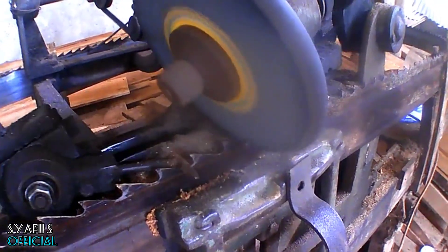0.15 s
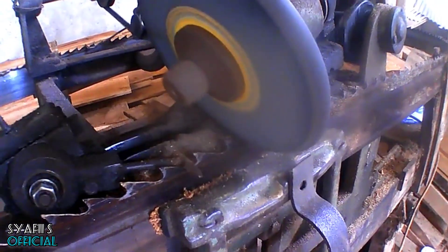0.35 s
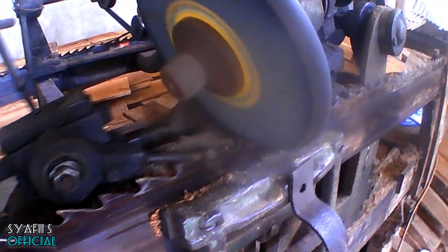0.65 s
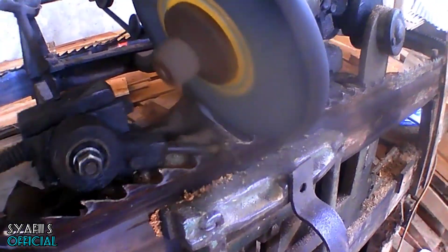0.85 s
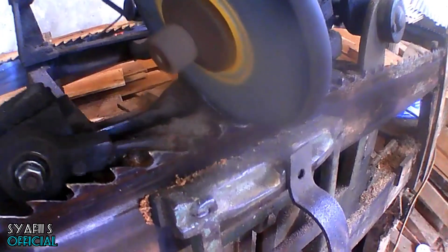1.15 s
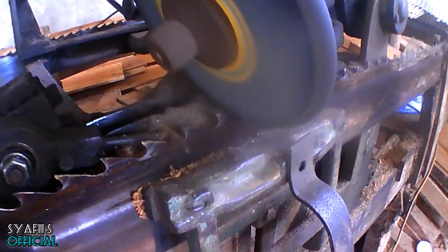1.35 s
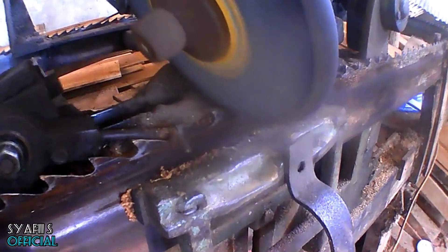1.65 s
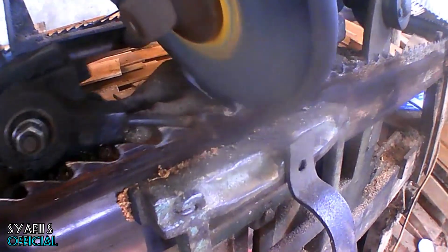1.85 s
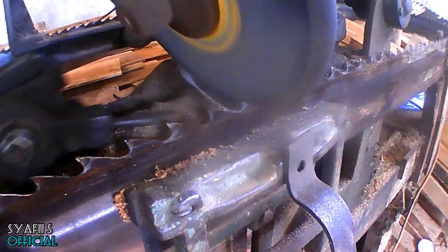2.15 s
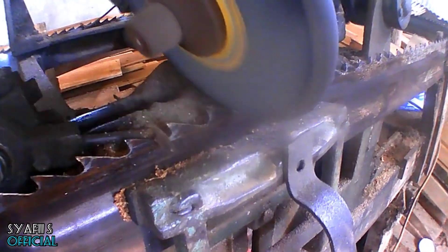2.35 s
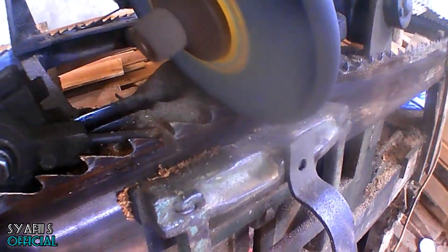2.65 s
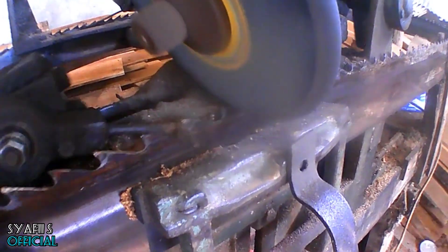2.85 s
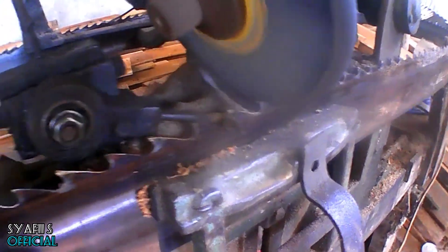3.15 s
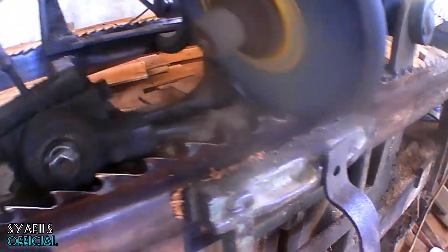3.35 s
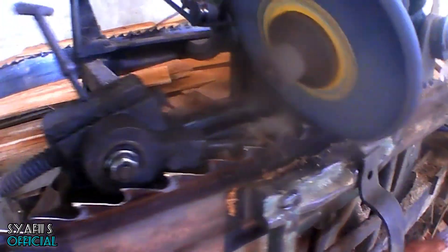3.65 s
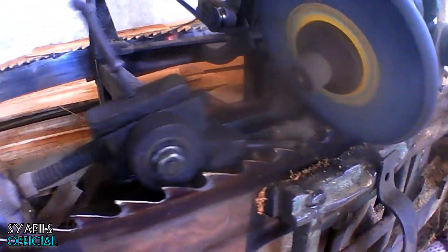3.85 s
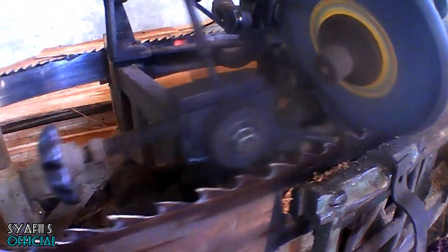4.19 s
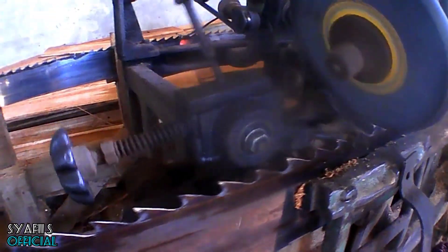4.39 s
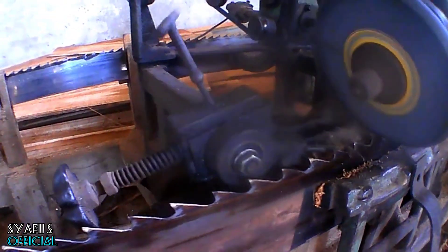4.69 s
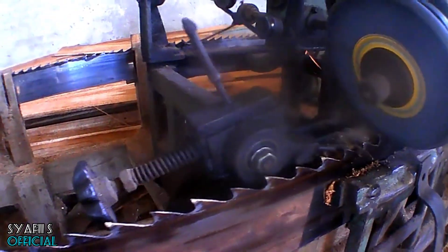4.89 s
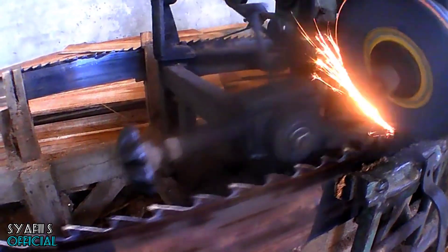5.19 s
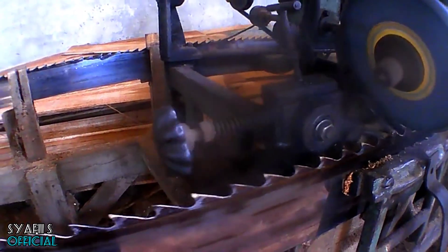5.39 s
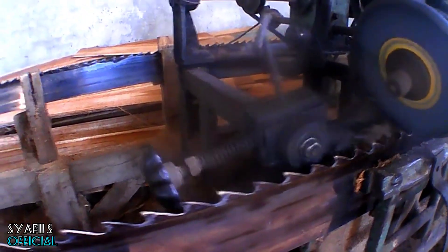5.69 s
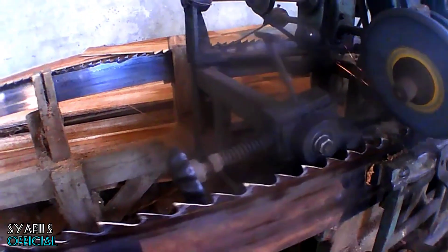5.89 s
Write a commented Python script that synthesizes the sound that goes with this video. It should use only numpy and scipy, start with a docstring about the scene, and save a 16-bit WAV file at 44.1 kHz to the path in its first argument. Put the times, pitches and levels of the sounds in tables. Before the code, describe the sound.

A blade sharpening machine runs throughout, close and somewhat dull, with a steady hiss, a fine rattle and a low hum. Further off a coasting saw whirrs, its pitch sinking slowly. At 0.3 seconds the grinding wheel bites the band saw blade in a short, gritty, rapidly throbbing rasp with a metallic ring. A longer, louder rasp comes from 2.5 to about 2.9 seconds. In between, the blade scuffs softly along its guide and the feed ticks, most clearly around 2 seconds. The distant saw swells into brief whistles from about 3.1 to 3.4 seconds and at 4.5. At 4.8 seconds the wheel grinds more smoothly for about half a second, with a rough high squeal, a few dull ticks and bright spits of sparks. One last short rasp with a sizzle follows at 5.3 seconds. The wooden walls add a short reverb, and the machine runs on.

```python
"""An automatic sharpener works along a band saw blade in a sawmill, heard close and dull. From the start
its drive hisses and hums, and further off a saw whirrs as it coasts. At 0.3 s and 2.5 s the grinding
wheel rasps into the gullets: slightly out of round, it bites once a turn, and its grit rings the blade.
Between the rasps the feed scuffs and ticks. At 4.8 s the wheel squeals over a tooth tip, throwing
sparks, and at 5.3 s it gives one last short rasp."""
import sys
import numpy as np
from scipy import signal
from scipy.fft import rfft, irfft, next_fast_len
from scipy.io import wavfile
from scipy.ndimage import map_coordinates

SR = 44100
rng = np.random.default_rng(int(sys.argv[2]) if len(sys.argv) > 2 else 0)


def generate_wav(signal):
    """Clip the signal to [-1, 1] and save it as 16-bit WAV at the path in sys.argv[1]."""
    frames = np.transpose(np.atleast_2d(signal))
    scaled = np.clip(frames, -1, 1) * 32767
    pcm = np.round(scaled).astype(np.int16)
    wavfile.write(sys.argv[1], SR, pcm)


N = 265923
TIME = np.arange(N) / SR
TOP_HZ = 7300  # the microphone's band limit


def amp(db):
    """Decibels to gain."""
    return 10 ** (np.asarray(db) / 20)


def unit(x):
    """Scale to rms 1."""
    return x / np.sqrt(np.mean(x ** 2) + 1e-20)


def swells(rows):
    """Bell-shaped gains from rows of t/s, half length/s, level/dB."""
    return sum(amp(db) * np.exp(-.5 * ((TIME - s) / half) ** 2) for s, half, db in rows)


def wobble(rate):
    """A smooth random curve, rate knots a second."""
    return map_coordinates(rng.standard_normal(int(N * rate / SR) + 4), [TIME * rate])


def filtered(x, response):
    """x through a complex frequency response."""
    size = next_fast_len(N + SR // 4)
    return irfft(rfft(x, size) * response(np.fft.rfftfreq(size, 1 / SR)), size)[:N]


def coloured(x, points):
    """x through an EQ curve of f/Hz, relative level/dB, scaled to rms 1."""
    f, db = np.transpose(points)
    return unit(filtered(x, lambda hz: amp(np.interp(np.log(hz + 1), np.log(f), db, -120, -120))))


def rung(x, modes, width_hz):
    """x through resonances (f/Hz, relative level/dB) of alternating polarity, scaled to rms 1."""
    def response(f):
        damping = 1j * f * width_hz
        return sum((-1) ** k * amp(db) * damping / (hz * hz - f * f + damping)
                   for k, (hz, db) in enumerate(modes))
    return unit(filtered(x, response))


def grit(clump_db, rate=700):
    """Countless tiny impacts that come in clumps."""
    return unit(rng.standard_normal(N) * amp(clump_db * wobble(rate)))


def grinding():
    """The wheel throbs in the gullets and runs smoother over the tips, squealing on the first."""
    # dips of the wheel: place, landing t/s, level/dB, hold/s, fade/(dB/s), length/s,
    # t/s of one bite, turning f/Hz, dip between bites/dB, tilt/(dB/octave), settling/s
    strokes = [("gullet", .274, -34, .01, 60, .016, 0.37, 32, 14, 2.5, 0.027),
               ("gullet", .309, -25.5, 0.09, 59, .195, .356, 28, 15.6, -1, .04),
               ("gullet", 2.5, -23, .18, 50, 0.406, 2.669, 25.5, 14.2, 1.5, 0.16),
               ("tip", 4.798, -27, 0.12, 26.5, 0.4, 4.925, 28, 3.5, -.5, .05),
               ("tip", 5.343, -29, .05, 100, .125, 3.9, 31, 2.9, 2.2, .05)]
    # the blade rings differently at the two places of contact: f/Hz, relative level/dB
    gullet_modes = [(1674, -42), (1701, -38.5), (1915, -41.5), (2405, -45), (2912, -53), (3036, -53.5),
                    (3494, -50.5), (4043, -45), (4108, -46.5), (4225, -45.5), (4370, -51.5), (4700, -59.5),
                    (5146, -58.5), (5260, -55), (5440, -60)]
    tip_modes = [(1642, -41), (1690, -38), (1857, -40.5), (2412, -39.5), (3095, -48), (3994, -51.5),
                 (4517, -48.5), (5125, -52.5), (5399, -54.5), (5981, -63)]
    # the rush of the grit at those places: f/Hz, relative level/dB
    gullet_rush = [(710, -30), (1200, -15.5), (1420, -14), (1640, 3), (1810, -6.5), (2050, -4.5),
                   (2240, -16.5), (3010, -10), (3290, -19), (4120, -7.5), (4570, -21), (5340, -22.5),
                   (7080, -36), (9200, -67), (15600, -120)]
    tip_rush = [(710, -51.5), (1200, -10), (1430, -17), (1590, 1.5), (1650, 1.5), (2190, -10.5),
                (2380, -19), (2580, -10), (3290, -17.5), (4670, -11.5), (5070, -21.5), (6190, -23.5),
                (7080, -28.5), (9200, -54.5), (15600, -120)]
    in_gullet = [row for row in strokes if row[0] == "gullet"]
    on_tip = [row for row in strokes if row[0] == "tip"]
    gullets = sum(stroke(row, gullet_modes, gullet_rush, rush_db=2, width_hz=31) for row in in_gullet)
    tips = sum(stroke(row, tip_modes, tip_rush, rush_db=1, width_hz=30) for row in on_tip)
    return gullets + tips + squeal(on_tip[0])


def stroke(row, modes, rush, rush_db, width_hz, ring_db=-1.5, bite_shape=2.76, hardness=.17):
    """One rasp: the wheel's high spot bites once a turn; the grit hisses and rings the blade."""
    _, land_s, *_, bite_s, turn_hz, dip_db, tilt_db, settle_s = row
    off_bite = np.abs(np.sin(np.pi * turn_hz * (TIME - bite_s))) ** bite_shape
    # the wheel lands firmly; as steel is ground away, only its high spot still reaches
    clearance = np.clip((TIME - land_s) / settle_s, .4, 1)
    bite_db = effort(row) - dip_db * clearance * off_bite
    ring = rung(grit(clump_db=1.5), modes, width_hz)
    steel = amp(ring_db) * ring + amp(rush_db) * coloured(grit(clump_db=1.5), rush)
    steel = unit(filtered(steel, lambda hz: amp(tilt_db * np.log2(np.clip(hz, 1000, TOP_HZ) / 1000))))
    treble = filtered(steel, lambda hz: np.clip((hz - 2000) / 400, 0, 1))
    treble_db = hardness * (bite_db + 25.5)  # a deeper bite brings out the upper modes
    return amp(bite_db) * (steel - treble + amp(treble_db) * treble)


def effort(row, attack_s=.01, lift_db_per_s=420):
    """A stroke's envelope in dB: the wheel lands, holds, eases as steel is ground away, lifts off."""
    _, land_s, level_db, hold_s, fade_db_per_s, length_s = row[:6]
    age = TIME - land_s
    attack_db = 20 * np.log10(np.clip(age / attack_s, 1e-6, 1))
    fade_db = fade_db_per_s * np.maximum(age - hold_s, 0)
    lift_db = lift_db_per_s * np.maximum(age - length_s, 0)
    return level_db + attack_db - fade_db - lift_db


def squeal(row, landing_hz=4430, seated_hz=4720, glide_s=.045, width_hz=260, fade_db_per_s=13):
    """A rough tone that glides up as the wheel seats itself and rides the stroke's envelope."""
    age = np.maximum(TIME - row[1], 0)
    pitch_hz = seated_hz + (landing_hz - seated_hz) * np.exp(-age / glide_s) + 80 * wobble(45)
    phase = 2 * np.pi * np.cumsum(pitch_hz) / SR
    tone = unit(wobble(width_hz) * np.cos(phase) + wobble(width_hz) * np.sin(phase))
    return amp(effort(row) - 13.5 - fade_db_per_s * age) * tone


def sparks():
    """Spits of grit and showers of sparks fly off in short, bright bursts."""
    # bursts: t/s, half length/s, level/dB
    bursts = [(.155, 0.004, -45), (2.467, 0.0033, -50.5), (4.78, 0.0038, -43), (4.934, 0.0087, -32),
              (5.175, 0.012, -44), (5.357, 0.0078, -34.5), (5.39, 0.012, -29)]
    # their sizzle: f/Hz, relative level/dB
    sizzle = [(2500, -31.5), (3800, 6.5), (4600, -3.5), (5000, -16), (5500, -3.5), (6400, -2), (7200, -17)]
    return swells(bursts) * coloured(grit(clump_db=2), sizzle)


def feed(tick_db=-6.5, tick_t60=.06, tick_rise_s=.001):
    """The blade scuffs along its guide and knocks when the pawl or the wheel catches a tooth."""
    # caught teeth: t/s, relative level/dB
    ticks = [(0.317, -21), (1.9777, -18.5), (1.999, -24), (2.052, -26), (2.326, -24), (4.376, -26.5),
             (4.8818, -17.5), (4.965, -18), (5.006, -22.5)]
    # slides along the guide: t/s, half length/s, level/dB
    scuffs = [(.14, 0.046, -41.5), (.48, 0.034, -36.5), (.75, 0.076, -42), (1.19, 0.046, -36),
              (2.01, 0.056, -39.5), (2.32, 0.058, -42.5), (3.71, 0.049, -36), (4.4, 0.033, -37),
              (4.58, 0.034, -50)]
    # the colours of the dull knock and of the scuff: f/Hz, relative level/dB
    knock_colour = [(900, -31), (1500, -8), (1800, 5.5), (2100, 0), (2500, -15.5), (3900, -11.5),
                    (4600, -25), (7000, -38.5)]
    scuff_colour = [(600, -31), (1100, 3), (1450, -6), (1900, 8), (2400, -8), (3200, -8.5), (4000, 1.5),
                    (4700, -14), (7000, -22)]
    blows = np.zeros(N)
    for start_s, db in ticks:
        age = np.maximum(TIME - start_s, 0)
        blows += np.minimum(age / tick_rise_s, 1) * amp(db + tick_db - 60 * age / tick_t60)
    knocks = blows * coloured(rng.standard_normal(N), knock_colour)
    return knocks + swells(scuffs) * coloured(grit(clump_db=3.5), scuff_colour)


def machine(body_db=-38.5, hiss_db=-45, rumble_db=-52, frame_db=-52, cycle_s=2.25, crest_s=2.36):
    """Bearings and belt rattle the frame; the spinning wheel hisses over the hum of the drive."""
    # the colours of the rattle, the wheel's hiss and the low rumble: f/Hz, relative level/dB
    body_colour = [(240, -21), (400, -13.5), (524, -12), (569, -12), (609, -14.5), (656, -7), (774, -10),
                   (1050, -7.5), (1230, -4), (1510, -5), (1630, 1.5), (1860, 1), (2190, -10.5), (2400, -17),
                   (3120, -49.5), (5280, -120)]
    hiss_colour = [(1290, -39.5), (2200, -10), (2430, -2), (2620, -0.5), (3320, -3.5), (3940, 0),
                   (4510, -8.5), (4980, -17), (5360, -11.5), (5940, -16), (6450, -14.5), (7080, -25),
                   (9200, -50), (15600, -120)]
    rumble_colour = [(11, -39.5), (18, -8.5), (48, -1.5), (80, -9.5), (129, -5), (167, -8.5), (200, -3.5),
                     (242, -7.5), (272, -7.5), (416, -6), (600, -2), (780, -25.5), (1320, -120)]
    # the drive's tones: f/Hz, level/dB
    hum_tones = [(54, -69.5), (116, -70.5), (270, -65), (309, -65), (383, -66), (562, -71), (579, -67),
                 (714, -66), (738, -66)]
    cycle = np.cos(2 * np.pi * (TIME - crest_s) / cycle_s)  # a slight swell as the wheel comes down
    flutter_db = .6 * wobble(28) + .14 * wobble(2.7)
    body = amp(body_db + .14 * cycle + flutter_db) * coloured(grit(clump_db=1, rate=300), body_colour)
    hiss = amp(hiss_db + .9 * cycle + flutter_db) * coloured(grit(clump_db=1), hiss_colour)
    rumble = amp(rumble_db) * coloured(rng.standard_normal(N), rumble_colour)
    hum = sum(amp(db) * unit(np.sin(2 * np.pi * hz * TIME + 1.1 * wobble(3))) for hz, db in hum_tones)
    frame = amp(frame_db) * rung(grit(clump_db=1.5, rate=300), modes=[(1267, 0)], width_hz=40)
    return body + frame + hiss + rumble + hum


def coasting_saw(base_hz=325.4, sag_hz_per_s=2.25, surplus_hz=21, settle_s=.96, jitter_hz=.494):
    """A saw coasts further off: its teeth whirr in a sinking stack of partials, some singing out."""
    # the whirr, from the seventh partial upward: relative level/dB
    whirr_levels = [-65, -58.5, -61, -60.5, -58, -59, -62.5, -70.5, -67.5, -72, -70.5, -77.5, -72, -70.5,
                    -81]
    # two steady whistles: multiple of the tooth rate, level/dB
    whistles = [(4, -53), (6, -51)]
    # resonances of the saw's plate: f/Hz, half width/Hz, lift/dB
    plate = [(1263, 12, 3), (1885, 20, 3), (5480, 55, 4.5)]
    # partials that sing out: t/s, half length/s, multiple of the tooth rate, level/dB
    flares = [(0.058, .05, 16, -59), (0.248, 0.031, 12, -51), (.7, .03, 13, -57), (0.953, .1, 8, -60),
              (1.7, .04, 17, -63), (2.123, 0.095, 8, -55), (3.13, 0.14, 6, -44.5), (3.378, 0.093, 4, -44.5),
              (4.545, 0.074, 4, -51), (4.546, .09, 6, -45.5)]
    # a surplus of speed dies away, the rest sinks slowly
    tooth_hz = base_hz - sag_hz_per_s * TIME + surplus_hz * np.exp(-TIME / settle_s)
    phase = 2 * np.pi * np.cumsum(tooth_hz + jitter_hz * wobble(40)) / SR

    def partial(order, db):
        """One multiple of the tooth rate, blurred by moving air, lifted as it passes a resonance."""
        tone = unit(amp(2.5 * wobble(40)) * np.sin(order * phase + .7 * wobble(35)))
        plate_db = sum(lift / (1 + ((order * tooth_hz - hz) / half) ** 2) for hz, half, lift in plate)
        singing = swells((s, half, peak) for s, half, multiple, peak in flares if multiple == order)
        return tone * (amp(db + plate_db) + singing)

    whirr_db, flicker_db = 1, 2.5
    whirr = sum(partial(order, db + whirr_db + flicker_db * wobble(4))
                for order, db in enumerate(whirr_levels, 7))
    return whirr + sum(partial(order, db) for order, db in whistles)


def shed(x, t60=.34):
    """The short reverb of the wooden walls."""
    t = TIME[:SR // 2]
    tail = rng.standard_normal(len(t)) * amp(-60 * t / t60)
    return signal.fftconvolve(x, tail / np.linalg.norm(tail))[:N]


def scene():
    """The work at the wheel and its reverb, over a bed of running machine and coasting saw."""
    work = grinding() + sparks() + feed()
    return (work + amp(-9.5) * shed(work) + machine() + coasting_saw())[None]


def record(dry):
    """The dull microphone cuts off steeply at its band limit."""
    return filtered(dry[0], lambda hz: np.clip((TOP_HZ - hz) / 200 + .5, 0, 1))[None]


dry = scene()
out = record(dry)
generate_wav(out)
```